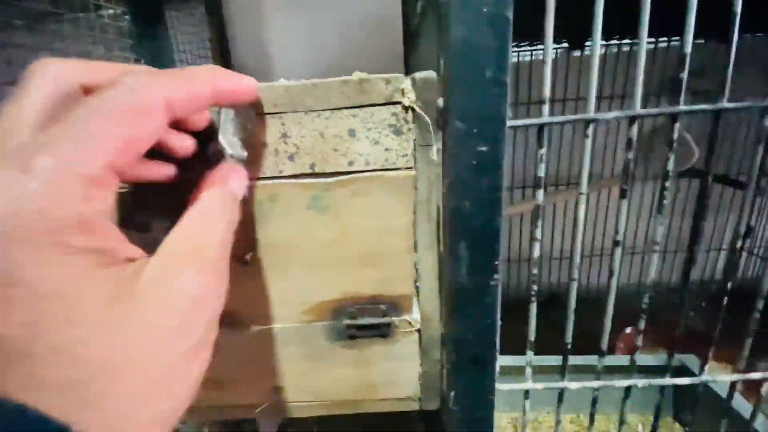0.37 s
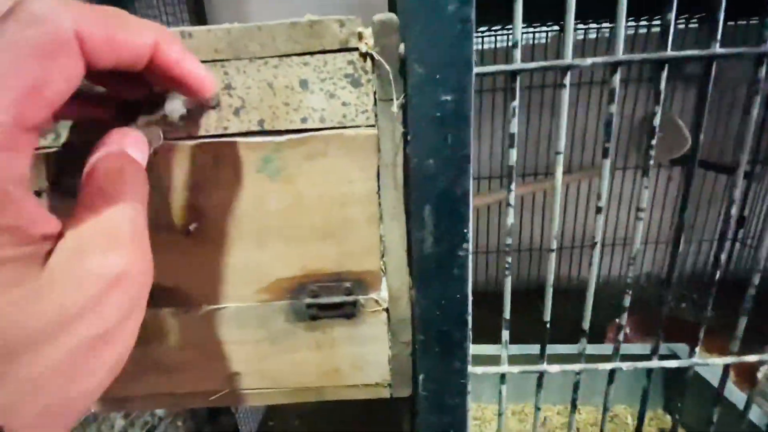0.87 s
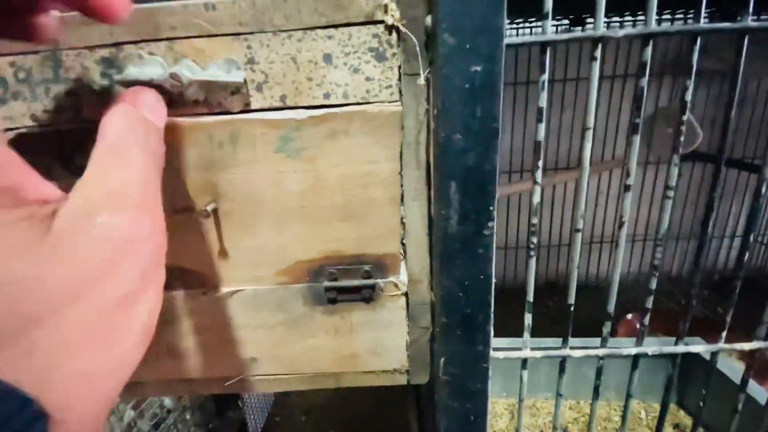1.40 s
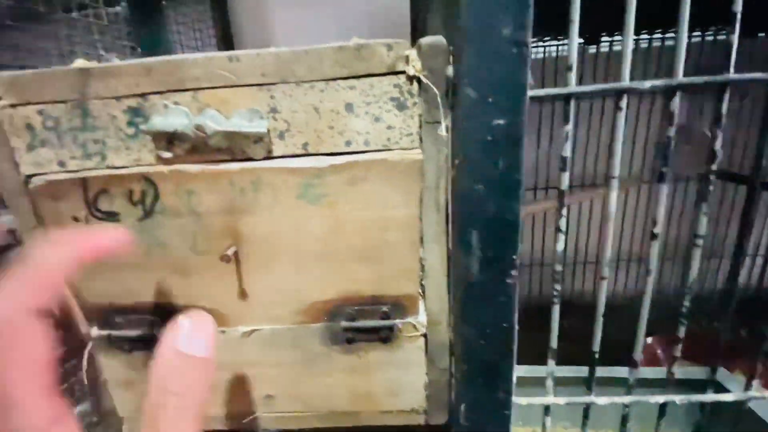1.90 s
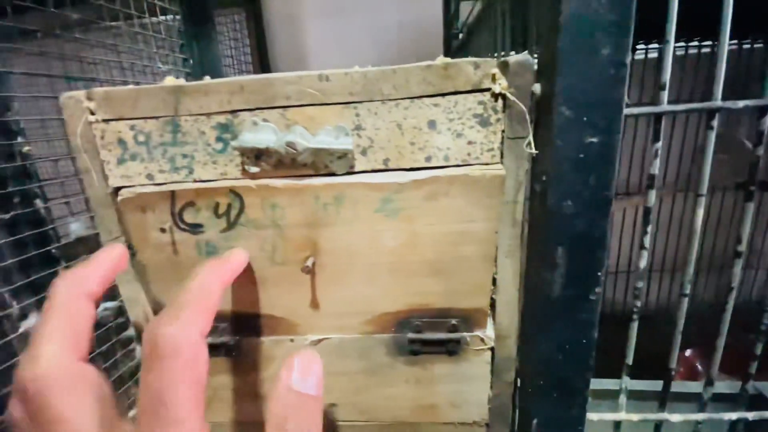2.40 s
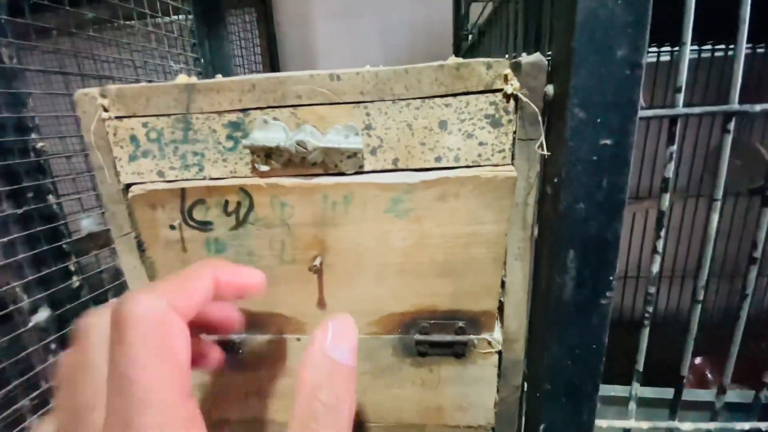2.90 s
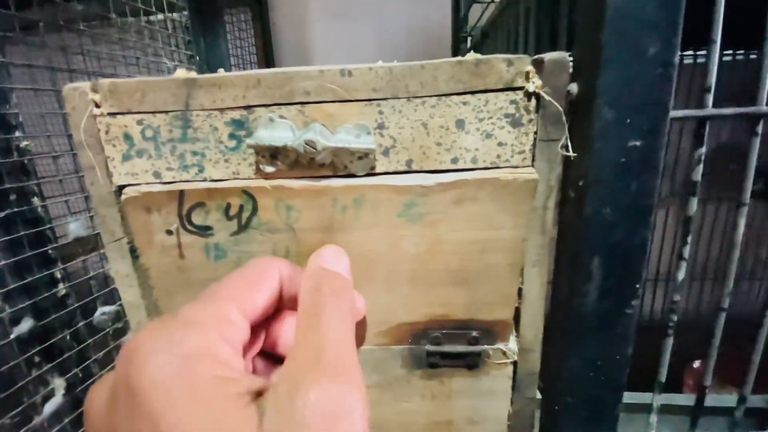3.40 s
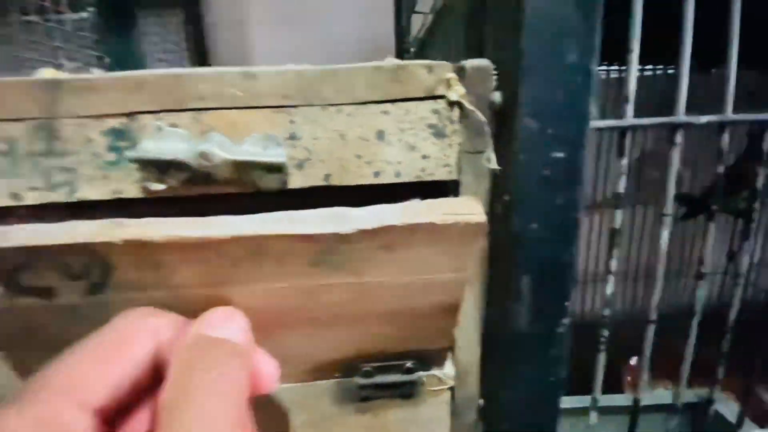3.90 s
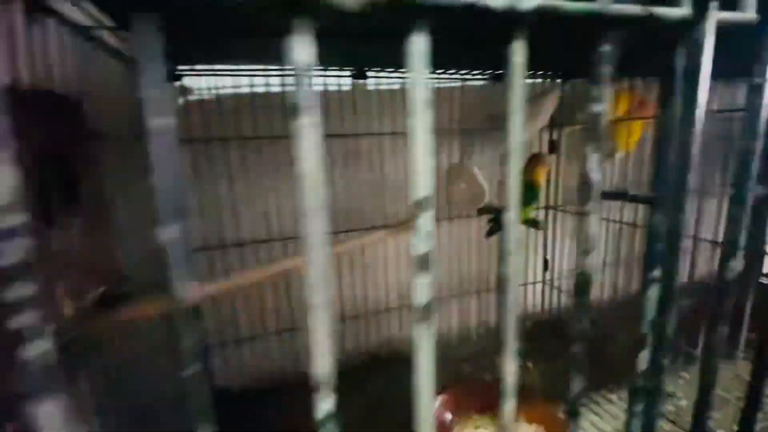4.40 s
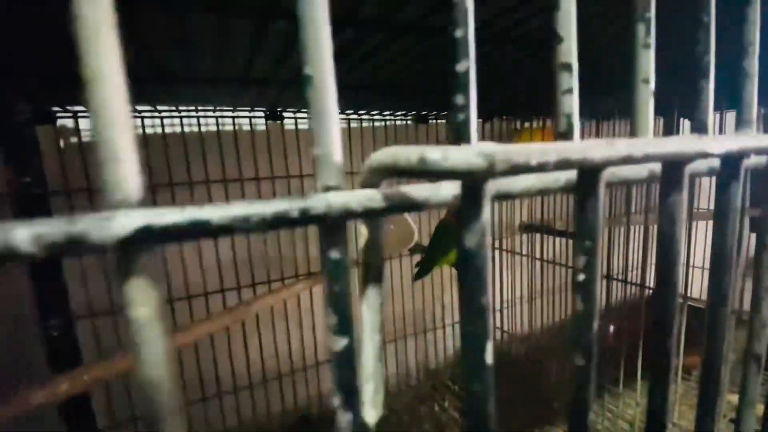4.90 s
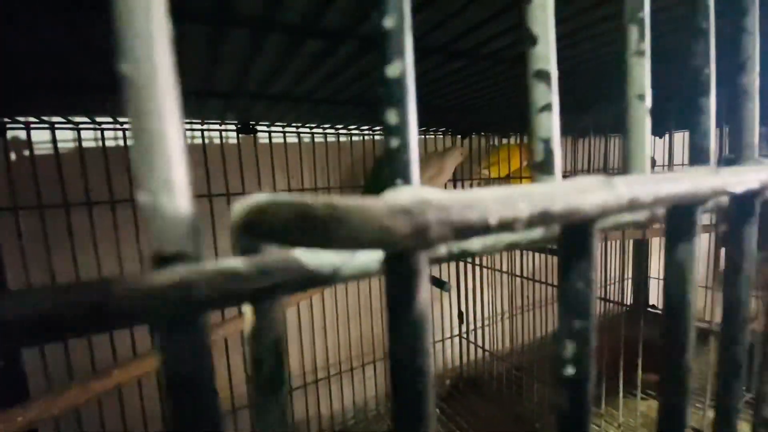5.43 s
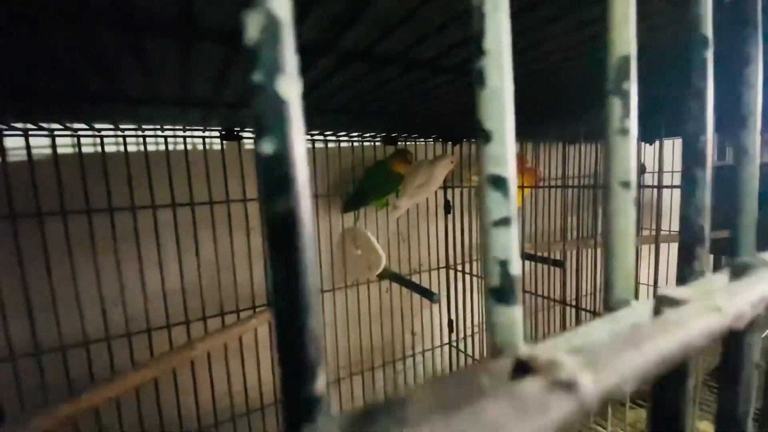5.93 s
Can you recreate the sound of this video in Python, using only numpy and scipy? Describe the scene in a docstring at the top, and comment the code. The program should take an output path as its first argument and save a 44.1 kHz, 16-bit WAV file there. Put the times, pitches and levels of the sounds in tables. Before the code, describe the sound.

A quiet shed with low air noise and faint wavering hum. At about 0.05 s fingers tap lightly on a wooden box with a soft rub; a thin high peep follows at 0.6 s, then a dull touch and rustle near 0.95 s. From 1.17 to 1.47 s a small parrot gives a loud harsh squawk sliding upward in two parts, ending in a husky chirp until 1.7 s. Weak rasps lead to a tiny clicking shriek at 2.4 s, scratchy notes and soft knocks to 2.7 s, rising chirps at 2.85 s and the strongest piercing shriek at 3.1 s. At 3.4 s the door gives a crisp dry crack and scrape. Hoarse snapped chirps come at 3.55 s, a wavering call at 3.75-3.97 s. A barely audible moan sinks from 4.1 s; two tiny peeps at 4.6 s, then faint rasps, murmuring chatter and feather rustles until 6.1 s.

```python
"""Small parrots chirp, whistle and rasp in an aviary, near and far: each note is a stack of partials
on a trembling pitch, with pulsed breath, coloured by the throat. A hand works the latch and door of
a wooden nest box, which rings in its modes. A faint moan sinks in pitch, feathers rustle as shaped
noise, the shed rings briefly with sparse echoes, and air noise and low hums lie under all."""
import sys
import numpy as np
from scipy import signal
from scipy.fft import rfft, irfft
from scipy.io import wavfile

SR = 44100
rng = np.random.default_rng(int(sys.argv[2]) if len(sys.argv) > 2 else 0)


def undo_db(level):
    """Turn decibels back into plain size, where 20 dB means ten times bigger."""
    steps = np.asarray(level, float) / 20
    return 10 ** steps


def dump(signal):
    """Clip the signal to [-1, 1] and save it as 16-bit WAV at the path in sys.argv[1]."""
    limited = np.clip(np.atleast_2d(signal).T, -1, 1)
    pcm = np.round(limited * 32767).astype(np.int16)
    wavfile.write(sys.argv[1], SR, pcm)


N = 266849  # length of the scene in samples


def evened(x):
    """Scales a sound to rms 1."""
    return x / np.sqrt(np.mean(x ** 2) + 1e-20)


def read(points, hz):
    """Reads a curve of (Hz, value) points along a log-frequency axis."""
    point_hz, value = np.transpose(points)
    return np.interp(np.log(hz + 1), np.log(point_hz + 1), value)


def add(mix, start_s, sound):
    """Mixes a sound in at start_s seconds."""
    part = mix[round(start_s * SR):][:len(sound)]
    part += sound[:len(part)]


def wander(count, hz):
    """Random drift of rms 1 that changes up to about hz times a second."""
    lowpass = signal.butter(2, hz, fs=SR, output="sos")
    drift = signal.sosfilt(lowpass, rng.standard_normal(count + 500))
    return evened(drift[500:])


def noise(field_db, count):
    """Noise whose short-time spectrum follows field_db(hz, s)."""
    frames = count // 128 + 5
    hz = np.fft.rfftfreq(512, 1 / SR)[:, None]
    s = np.arange(frames) * 128 / SR
    a, b = rng.standard_normal((frames, 257, 2)).T
    spectrum = (a + 1j * b) * undo_db(field_db(hz, s))
    sound = signal.istft(spectrum, nperseg=512, noverlap=384)[1][:count]
    return 8 * sound / 128


# how a note is voiced: (pitch jitter rms as a share, breath level in dB against the tone)
CLEAR, REEDY, PIERCING = (.018, -30), (.022, -34), (.012, -28)
HUSKY, HOARSE, RASPY = (.04, -26), (.07, -18), (.12, -10)
SQUAWK, CRACKLY = (.013, -13), (.03, -6)
# how the throat lifts or damps each pitch: frequency_hz [Hz], gain_db [dB]
THROAT = [(600, -24.5), (1000, -12), (2000, 6.5), (3000, 10), (3900, 12.5), (5000, 10.5), (6200, 7.5),
          (8000, 1), (10500, 3), (12500, -12), (14500, -7.5), (16000, -14)]
# the throat of a bigger bird, which gives the squawk: frequency_hz [Hz], gain_db [dB]
BIG_THROAT = [(600, -48), (1000, -22), (2000, -7.5), (3000, 6.5), (3900, -13), (4800, 1), (6200, -5),
              (7600, -17.5), (9000, -19), (10800, -5), (14000, -7.5), (16000, -3.5)]


def note(voice, colour, rows):
    """The syrinx gives partials on a trembling pitch, plus breath pulsed each cycle; the throat colours both."""
    jitter, breath_db = voice
    slope_db, odd_db, echo_db = colour
    tract = BIG_THROAT if voice == SQUAWK else THROAT
    s, *columns = np.transpose(rows)
    t = np.arange(s[0], s[-1], 1 / SR)
    hz, level_db = (np.interp(t, s, column) for column in columns)
    # the breath pressure shimmers
    level_db += 1.5 * wander(len(t), hz=120)
    trembling_hz = hz * (1 + jitter * wander(len(t), hz=250))
    turns = np.cumsum(trembling_hz) / SR

    k = np.arange(1, 17)[:, None]  # partial numbers
    partials_db = read(tract, k * hz) + slope_db * np.log2(k) + odd_db * (k % 2)
    partials = undo_db(partials_db) * (k * hz < 17000)
    partials /= np.sqrt((partials ** 2).sum(0) / 2)
    # each partial swells and breaks on its own, the higher ones more
    partials *= [undo_db(1.6 * np.log2(n) * wander(len(t), hz=40)) for n in k[:, 0]]
    waves = np.cos(2 * np.pi * (k * turns + rng.random(k.shape)))
    tone = (partials * waves).sum(0)

    puffs = rng.standard_normal(len(t)) * (1 + np.cos(2 * np.pi * turns))
    f = np.fft.rfftfreq(len(t), 1 / SR) + 1
    # the breath has little far below the pitch and follows a milder slope than the partials above it
    below_db = 45 * np.log2(f / hz.mean() / .75)
    above_db = .7 * slope_db * np.log2(f / hz.mean())
    shape_db = read(tract, f) + np.minimum(below_db, above_db)
    breath = evened(irfft(rfft(puffs) * undo_db(shape_db), len(t)))
    tone += undo_db(breath_db) * breath

    # soft start and end, so that the note does not click
    fade_s = min(.004, .25 * (s[-1] - s[0]))
    to_nearest_end_s = np.minimum(t - s[0], s[-1] - t)
    edge = np.sin(np.pi / 2 * np.clip(to_nearest_end_s / fade_s, 0, 1)) ** 2
    return undo_db(level_db) * edge * tone, undo_db(echo_db)


BOW = .03  # the middle of a short note strays from the straight glide by up to this share


def short_note(voice, rule, start, length, peak_db, first_hz, last_hz):
    """One breath: a slightly bowed glide in pitch under a rise and fall in level."""
    slope_db, brighter, echo_db, rise, onset_db, end_db = rule
    rise = np.clip(rise, .02, .98)
    straight_hz = first_hz + rise * (last_hz - first_hz)
    middle_hz = straight_hz * (1 + BOW * rng.uniform(-1, 1))
    rows = [(start, first_hz, peak_db + onset_db),
            (start + rise * length, middle_hz, peak_db),
            (start + length, last_hz, peak_db + end_db)]
    return voice, (slope_db + brighter * (peak_db + 50), 0, echo_db), rows


# Parts of a shriek. Each starts with its colour: slope [dB per octave], odd partials [dB], echo [dB].
# the click, then its rows: time_s [s], pitch_hz [Hz], level_db [dB before the click's own gain]
CLICK = (5, -5.5, 3), [(0, 2306, -32), (.004, 2403, -23)]
# the upward scrape, then its rows: time_s [s], pitch_hz [Hz], level_db [dB]
SCRAPE = (5.3, -12.5, -5.5), [(0, 2100, -13), (.005, 2149, -21.5), (.008, 2973, -23), (.015, 3400, -24)]
# the whistle, colour without slope, then its rows:
# time_share [share of the whistle length], pitch_hz [Hz], level_db [dB before the whistle's own gain]
SHRILL = (-1, -8.5), [(0, 4760, -11.5), (.3, 5152, -16.5), (.75, 5026, -14), (1, 5250, -13)]
SECOND_CLICK_S, SCRAPE_S, WHISTLE_S = .012, .018, .033  # delays after the shriek starts
SECOND_CLICK_DB = 2.5  # gain of the second click


def shriek(start, first_db, whistle_db, slope_db, whistle_s):
    """The voice breaks twice with a click, scrapes upward with a crackle, then whistles piercingly."""
    odd_and_echo_db, whistle_rows = SHRILL
    shrill = (slope_db, *odd_and_echo_db), whistle_rows
    # voice, part, delay in s, time stretch, gain in dB
    parts = [(CRACKLY, CLICK, 0, 1, first_db),
             (CRACKLY, CLICK, SECOND_CLICK_S, 1, SECOND_CLICK_DB),
             (CRACKLY, SCRAPE, SCRAPE_S, 1, 0),
             (PIERCING, shrill, WHISTLE_S, whistle_s, whistle_db)]
    notes = []
    for voice, (colour, rows), delay, stretch, more_db in parts:
        placed = [(start + delay + stretch * s, hz, db + more_db) for s, hz, db in rows]
        notes.append((voice, colour, placed))
    return notes


# calls with their own contour, short or long: voice, colour (slope [dB per octave],
# odd partials [dB], echo [dB]), then rows of time_s [s], pitch_hz [Hz], level_db [dB]
CONTOUR_CALLS = [ (SQUAWK, (-9.5, 0.085, 2.5), [(1.172, 802, -55), (1.185, 952, -42.5), (1.218, 1009, -33),
                 (1.245, 1048, -32), (1.3, 1169, -38.5)]), (SQUAWK, (-8.5, 3.8, -1), [(1.3, 1171, -37),
                 (1.348, 1433, -31), (1.412, 1534, -32.5), (1.45, 1481, -40), (1.47, 1635, -58)]),
                 (HUSKY, (-24.5, 0, 1), [(1.45, 2500, -43), (1.5, 2290, -39.5), (1.525, 2701, -37.5),
                 (1.55, 2930, -33), (1.59, 2650, -45), (1.7, 2716, -64.5), (1.84, 2700, -81.5)]),
                 (RASPY, (-5, -11.5, .1), [(2.025, 3502, -64.5), (2.06, 3386, -49), (2.11, 3370, -54.5),
                 (2.16, 3230, -55.5)]), (HOARSE, (-4, -7.5, .1), [(2.27, 2940, -59.5), (2.3, 3130, -55.5),
                 (2.33, 3120, -61.5)]), (HOARSE, (-15, 0, .1), [(2.81, 2167, -64), (2.85, 3524, -50.5),
                 (2.87, 3703, -44), (2.92, 4000, -40.5), (2.96, 4030, -49.5)]), (HOARSE, (-10.5, 0, .1),
                 [(1.548, 2940, -45), (1.57, 2469, -35.5), (1.6, 2197, -44.5)]), (HUSKY, (2.5, 0, .1),
                 [(3.125, 3366, -26), (3.15, 3340, -34), (3.2, 3330, -52)]), (HUSKY, (-22.5, 0, 0.05),
                 [(3.745, 1395, -52), (3.765, 1700, -48.5), (3.785, 1698, -45.5), (3.792, 2056, -46),
                 (3.835, 1943, -37.5), (3.85, 1649, -44.5), (3.875, 1678, -44), (3.905, 2028, -42.5),
                 (3.92, 2503, -47.5), (3.95, 2757, -58.5), (3.97, 2490, -45.5)]), ]
# the shrieks: start_s [s], first_click_db [dB gain], whistle_db [dB gain],
# whistle_slope_db [dB per octave], whistle_length_s [s]
SHRIEKS = [(2.396, -9, 2.5, 0, 0.01675), (3.092, 1.5, -1, 6.5, 0.026)]
# brief high peeps: start_s [s], length_s [s], peak_db [dB], first_hz [Hz], last_hz [Hz]
PEEPS = [(0.571, 0.03, -37.5, 5294, 5813), (4.62, 0.023, -41, 6320, 6250), (4.634, .027, -44, 5330, 5560),
         (5.761, 0.0435, -47, 3404, 3265)]
# clear whistles: start_s [s], length_s [s], peak_db [dB], first_hz [Hz], last_hz [Hz]
WHISTLES = [(.79, 0.046, -71, 11700, 11600), (.87, 0.094, -68.5, 10140, 10500),
            (.87, .07, -68, 14600, 14600), (.985, .05, -71, 14800, 14800),
            (1.685, 0.059, -75, 11600, 11800), (1.035, 0.046, -65, 3730, 3820),
            (1.47, 0.16, -51.5, 1510, 1557), (3.494, 0.069, -54, 2860, 2830),
            (3.941, 0.071, -56.5, 3806, 3595)]
# rough rasps, the first (at 0.949 s) a scrape of the latch: start_s [s], length_s [s], peak_db [dB], first_hz
# [Hz], last_hz [Hz]
RASPS = [(0.949, 0.055, -64, 1700, 2554), (1.539, .04, -71, 14400, 14500), (2.502, 0.09, -51.5, 3800, 3410),
         (2.6, .15, -45, 3383, 3912), (2.994, 0.15, -43, 3990, 3900), (3.2, 0.18, -46, 3300, 3176),
         (4.78, .15, -65.5, 3570, 3075), (4.857, .035, -59, 2097, 2190), (4.79, 0.073, -64.5, 5560, 5800),
         (5.27, 0.12, -59, 3100, 3480), (5.288, 0.15, -67, 4200, 4330), (5.66, 0.062, -62.5, 4540, 5150),
         (5.819, 0.048, -58, 3033, 2980)]
# hoarse snapped notes: start_s [s], length_s [s], peak_db [dB], first_hz [Hz], last_hz [Hz]
SNAPS = [(3.534, 0.043, -39.5, 4570, 4520), (3.537, 0.059, -46, 3500, 3500),
         (3.6, 0.052, -36.5, 4600, 3640), (3.604, 0.0525, -41, 3507, 3180)]
# soft husky chatter: start_s [s], length_s [s], peak_db [dB], first_hz [Hz], last_hz [Hz]
CHATTER = [(.965, 0.032, -71, 5070, 5050), (1.034, 0.051, -73, 2950, 2970), (1.04, 0.019, -70, 2150, 2126),
           (2.232, 0.038, -62, 2044, 2290), (3.756, 0.033, -52, 3240, 3320),
           (3.85, 0.074, -57.5, 3354, 2990), (4.02, .05, -68, 2600, 2810), (4.06, 0.043, -67, 1260, 1230),
           (4.166, 0.03, -65, 1012, 1088), (4.49, 0.027, -72, 3560, 3645), (4.775, 0.056, -68, 3590, 3490),
           (4.87, 0.068, -68, 3230, 3120), (4.787, 0.06, -73, 1048, 1090), (5.29, 0.053, -68.5, 1226, 1224),
           (5.346, 0.12, -63, 2132, 2585), (5.4, .14, -66.5, 1356, 1308), (5.291, 0.0645, -65, 2990, 3050),
           (5.401, .07, -73, 3550, 3590), (5.55, 0.044, -69.5, 3150, 3044), (5.601, 0.1, -68.5, 1873, 1803),
           (5.621, 0.24, -74.5, 1450, 1404), (5.659, 0.096, -68.5, 1028, 981),
           (5.85, 0.044, -62, 2285, 2410), (5.87, 0.057, -68, 1186, 1363),
           (5.949, 0.073, -68.5, 1323, 1343), (5.955, 0.16, -63, 3050, 3100),
           (5.989, 0.041, -61.5, 2240, 2260)]
# the louder a short note, the brighter (whistles keep their slope): (slope in dB per octave at a -50 dB
# peak, its gain for each dB, echo dB, rise as a share of the length, onset dB and end dB from the peak)
PEEP_RULE = (-1.5, 0.69, 6, 0.65, -12, -11.5)
WHISTLE_RULE = (-11, 0, -6.8, 0.5, -4, -12.5)
RASP_RULE = (-10, 0.9339, 0.65, 0.68, -8.5, -8)
SNAP_RULE = (0.5, 0.44, 0, 0.43, 1.5, -15)
CHATTER_RULE = (-11, 0.6, -0.1, 0.8, 0, -13.5)


def calls():
    """Every note of the flock, as voice, colour and rows of time, pitch and level."""
    kinds = [(REEDY, PEEP_RULE, PEEPS), (CLEAR, WHISTLE_RULE, WHISTLES), (RASPY, RASP_RULE, RASPS),
             (HOARSE, SNAP_RULE, SNAPS), (HUSKY, CHATTER_RULE, CHATTER)]
    notes = list(CONTOUR_CALLS)
    for row in SHRIEKS:
        notes += shriek(*row)
    for voice, rule, table in kinds:
        notes += [short_note(voice, rule, *row) for row in table]
    return notes


# the tones in which the wooden box rings: mode_hz [Hz],
# level_db [dB before the struck spot and the blow], fade_s [s to fall 60 dB]
BOX_MODES = [(130, -4, .1), (195, 0, .12), (290, -2, .1), (400, 0, .1), (520, -4, .08), (640, -4, .08),
             (850, -6, .07), (1100, -6, .07), (1500, -6, .07), (1850, -8, .06), (2200, -10, .05)]


def knock(blow_db, spot_hz, crack_db):
    """The box rings in its modes, most in those that the struck spot favours; metal parts add a bright crack."""
    t = np.arange(SR // 4) / SR
    ring = np.zeros(len(t))
    for hz, db, fade_s in BOX_MODES:
        off_spot_db = 11 * abs(np.log2(hz / spot_hz))
        ring += undo_db(db - off_spot_db - 60 * t / fade_s) * np.sin(2 * np.pi * hz * t)
    crack = undo_db(crack_db - 60 * t / 0.038) * rng.standard_normal(len(t))
    return undo_db(blow_db) * (ring + crack)


# fingers, latch and door on the box: start_s [s], blow_db [dB], favoured_mode_hz [Hz],
# crack_db [dB before the blow level]
KNOCKS = [(0.064, -42.5, 1570, -35), (.076, -52, 1220, -30), (0.936, -48, 166, -25), (2.23, -46, 626, -38),
          (2.61, -42, 217, -20), (3.386, -50.5, 403, -38), (3.388, -62, 1500, -2), (3.415, -52, 1120, 16.5)]


def box_knocks():
    """Every touch of the hand on the box, as a start in seconds and a sound."""
    return [(start_s, knock(*blow)) for start_s, *blow in KNOCKS]


# a faint sinking moan: time_s [s], pitch_hz [Hz], level_db [dB]
CREAK = [(4.09, 609, -79), (4.138, 562, -64), (4.22, 480, -73.5), (4.419, 454, -70), (4.5, 470, -77.5)]


def creak():
    """A low tone slides down, mostly falling; random changes of strength make it fuzzy."""
    s, *columns = np.transpose(CREAK)
    t = np.arange(s[0], s[-1], 1 / SR)
    hz, level_db = (np.interp(t, s, column) for column in columns)
    tone = np.sqrt(2) * np.cos(2 * np.pi * np.cumsum(hz) / SR)
    return undo_db(level_db) * wander(len(t), hz=24.5) * tone


def arch(t, start, length, rise, onset_db, end_db):
    """A stroke rises from onset_db to 0 dB, falls to end_db, and drops to -60 dB outside."""
    shares = np.array([-.05, 0, np.clip(rise, .02, .98), 1, 1.3])
    return np.interp(t, start + length * shares, [-60, onset_db, 0, end_db, -60])


# feathers and the moving hand: start_s [s], length_s [s], peak_db [dB at 4000 Hz before the bass cut],
# slope_db [dB per octave], rise_share [share of the length]
RUSTLES = [(0.033, 0.18, -56.5, -8, 0.27), (0.918, 0.14, -57.5, -6, 0.38), (3.336, 0.07, -43, 2.5, 0.18),
           (3.387, 0.018, -36.5, 1.5, .3), (3.408, 0.11, -39.5, -2.4, 0.11), (3.757, .11, -68.5, 5.5, 0.51),
           (4.423, 0.1, -60.5, -6.5, 0.36), (4.593, 0.26, -58, -7, 0.94), (4.795, 0.17, -52.5, -4.5, .45),
           (5.254, 0.088, -59, 6, 0.12), (5.28, 0.23, -65.5, 1.5, 0.66), (5.502, 0.21, -59, -5, 0.56),
           (5.66, 0.12, -60, 2.5, 0.44), (5.74, 0.47, -62.5, -4, .15)]
RUSTLE_ONSET_DB, RUSTLE_END_DB = -9.5, -16.5  # from the peak of each stroke
RUSTLE_REST_DB = -73  # the steady stir, before the bass cut


def rustle():
    """Rubbing gives grainy noise above the bass, tilted by how close and dry it is."""
    def field_db(hz, t):
        """Sums the strokes over a faint steady stir."""
        power = undo_db(RUSTLE_REST_DB) ** 2
        for s, length, db, slope_db, rise in RUSTLES:
            stroke_db = db + arch(t, s, length, rise, RUSTLE_ONSET_DB, RUSTLE_END_DB)
            tilt_db = slope_db * np.log2((hz + 1) / 4000)
            power = power + undo_db(stroke_db + tilt_db) ** 2
        bass_cut_db = 12 * np.log2(1 + 600 / (hz + 1))
        return 10 * np.log10(power) - bass_cut_db
    grain_db = 0.83 * wander(N, hz=150)
    return noise(field_db, N) * undo_db(grain_db)


# how long the shed rings: frequency_hz [Hz], fade_s [s to fall 60 dB]
SHED = [(300, 0.85), (1500, 0.3), (3000, 0.28), (5000, 0.29), (10000, 0.046), (16000, 0.41)]


def shed(x):
    """Walls return sparse echoes of random sign from 1.4 ms on, each band dying at its own speed."""
    taps = np.zeros(SR // 2)
    at = np.arange(60, len(taps) - 20, 20)
    taps[at + rng.integers(0, 20, len(at))] = rng.choice([-1., 1.], len(at))
    hz, t, z = signal.stft(taps, SR, nperseg=128)
    far_walls = undo_db(-60 * t / read(SHED, hz)[:, None])
    # the near cage walls strengthen the start, with one fade for all bands
    cage_walls = 1.2 * undo_db(-60 * t / 0.21)
    tail = signal.istft(z * (far_walls + cage_walls), SR, nperseg=128)[1]
    return signal.fftconvolve(x, tail / np.linalg.norm(tail))[:N]


# the colour of the air noise: frequency_hz [Hz], density_db [dB per Hz, relative]
AIR = [(12, -41.5), (20, -19.5), (44, -4), (74, -6.5), (113, -6.5), (234, -11), (459, -15.5), (1330, -21),
       (1710, -24), (2820, -27), (3530, -31), (5530, -36), (16000, -49.5)]
# slow swells of the hums: middle_s [s], half_width_s [s], level_db [dB], hum_hz [Hz]
HUM_SWELLS = [(.3, 0.39, -66.5, 50), (.95, 0.13, -61, 50), (5.15, 0.28, -63, 50), (5.898, 0.38, -63.5, 50),
              (.9, .2, -68.5, 121), (3.45, .2, -64.5, 121), (4.15, .5, -65.5, 121)]
AIR_DB = -65.5  # around which the air level drifts
HUM_HZ, HUM_DB = (50, 121), (-72, -76)  # the two hums and their resting levels
HUM_SPLIT_HZ = 85  # swells below this go to the lower hum, the others to the upper


def air():
    """Background noise with a drifting level, and two narrow wavering hums."""
    hiss = rng.standard_normal(N)
    hz = np.fft.rfftfreq(N, 1 / SR)
    coloured = irfft(rfft(hiss) * undo_db(read(AIR, hz)) * (hz > 30), N)
    bed = evened(coloured) * undo_db(AIR_DB + 0.79 * wander(N, hz=5))
    t = np.arange(N) / SR
    for hum_hz, rest_db in zip(HUM_HZ, HUM_DB):
        level = undo_db(rest_db)
        for s, width, db, near_hz in HUM_SWELLS:
            if (near_hz < HUM_SPLIT_HZ) == (hum_hz < HUM_SPLIT_HZ):
                level = level + undo_db(db) * np.exp(-((t - s) / width) ** 2)
        bed += level * wander(N, hz=9) * np.cos(2 * np.pi * hum_hz * t)
    return bed


def scene():
    """Each note sounds directly and, with its own echo level, in one of three shed corners, taken in turn."""
    direct, corners = np.zeros(N), np.zeros((3, N))
    for n, (voice, colour, rows) in enumerate(calls()):
        sound, echo = note(voice, colour, rows)
        start_s = rows[0][0]
        add(direct, start_s, sound)
        add(corners[n % 3], start_s, echo * sound)
    for start_s, sound in box_knocks():
        add(direct, start_s, sound)
        add(corners[0], start_s, undo_db(-4.5) * sound)
    add(direct, CREAK[0][0], creak())
    echoes = sum(shed(corner) for corner in corners)
    return (direct + echoes + rustle() + air())[None]


def band_limit(x):
    """A steep low-pass at the top of the band."""
    return signal.sosfilt(signal.butter(12, 16510, fs=SR, output="sos"), x)


def record(dry):
    """A low-pass filter takes away the highest treble of the finished mix."""
    lowpass = signal.firwin(255, 15800, fs=SR)  # edge in Hz
    limited = signal.oaconvolve(dry, lowpass[None], "same")
    return band_limit(limited)


dry = scene()
out = record(dry)
dump(out)
```